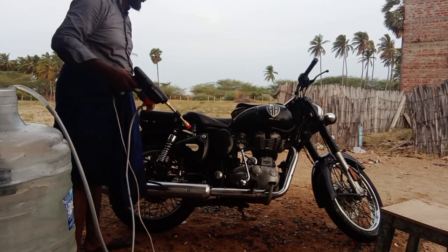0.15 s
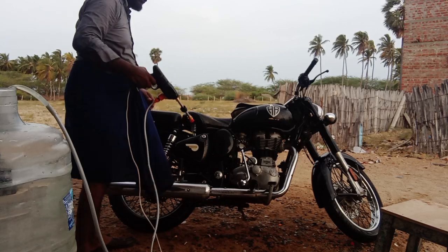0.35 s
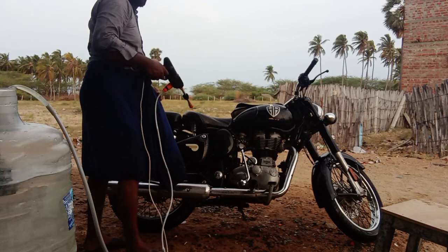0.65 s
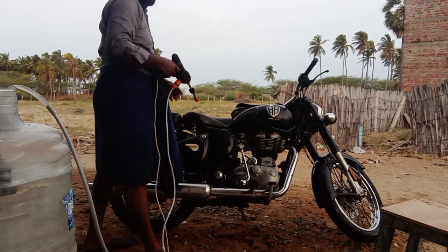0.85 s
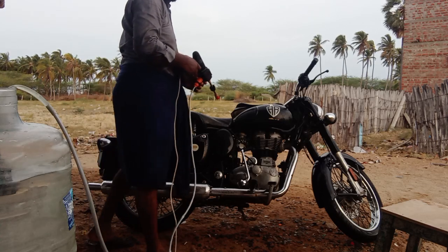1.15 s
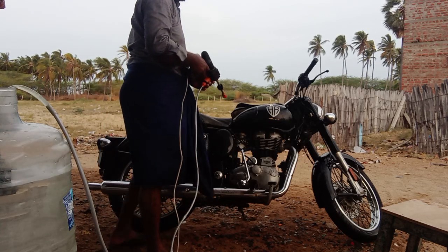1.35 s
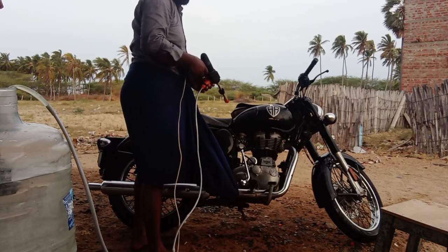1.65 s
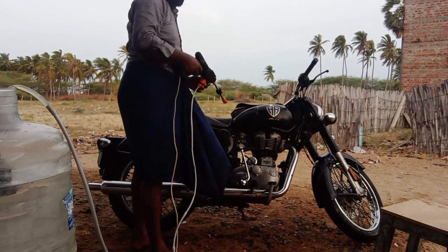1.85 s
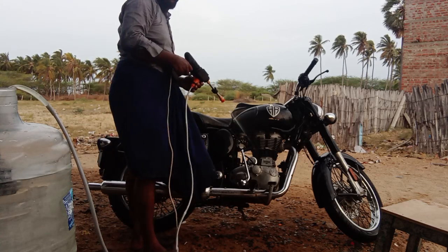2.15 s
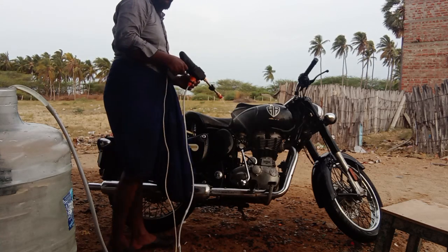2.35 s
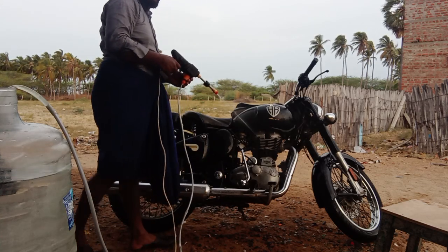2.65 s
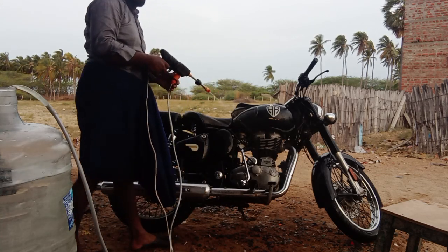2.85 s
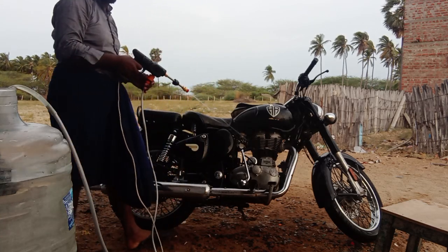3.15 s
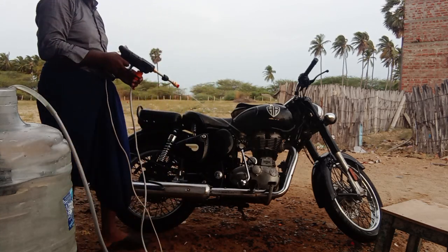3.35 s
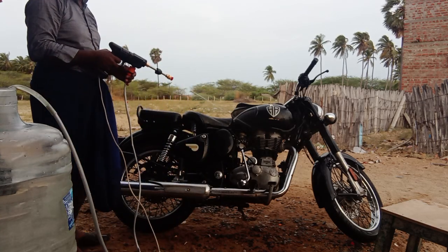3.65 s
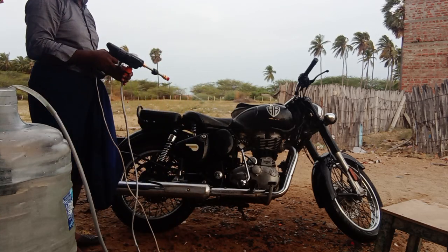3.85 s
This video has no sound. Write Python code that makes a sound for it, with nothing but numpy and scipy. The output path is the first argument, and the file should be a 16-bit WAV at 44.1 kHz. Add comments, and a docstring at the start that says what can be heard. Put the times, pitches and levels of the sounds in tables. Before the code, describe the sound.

Small electric sprayer pump clicks on and rattles steadily after two quiet seconds of birdsong outdoors

```python
"""A quiet dirt yard: wind rumbles on the microphone, a small bird chirps, a dove coos far off, bare feet scuff and
something thuds on a table. Then a switch clicks and a small electric pump with two strokes a turn starts, while the
nozzle hisses and spits. Impulses at every stroke excite casing resonances, over noise shaped into rattle and spray;
the birds are swept or steady sines, the thuds decaying table modes, and the click, scuffs, jet, wind and far rustle
are filtered noise."""
import sys
import numpy as np
from scipy import signal
from scipy.fft import rfft, irfft, next_fast_len
from scipy.io import wavfile
from scipy.ndimage import uniform_filter1d, map_coordinates

SR = 44100
rng = np.random.default_rng(int(sys.argv[2]) if len(sys.argv) > 2 else 0)


def rack_gain(trim_db):
    """Turn a fader trim in dB into the linear factor to multiply a signal by."""
    fader = np.asarray(trim_db, float)
    return 10 ** (fader / 20)


def store_wav(level_fs):
    """Save 16-bit WAV to argv[1]."""
    pcm = np.round(np.clip(np.atleast_2d(level_fs), -1, 1) * 32767)
    wavfile.write(sys.argv[1], SR, pcm.T.astype(np.int16))


N = 176400
T = np.arange(N) / SR  # time in seconds

# noise bursts, first the switch click, then the spits of the nozzle: start_s, level_db (relative), centre_hz
NOISE_BURSTS = [(2.075, -56, 9600), (2.13, -34, 11900), (2.55, -34.5, 8800), (2.778, -32, 11600),
                (2.934, -36.5, 7250), (3.087, -36.5, 8267)]


def unit(x):
    """Normalisation: the signal scaled to rms 1."""
    return x / np.sqrt(np.mean(x ** 2) + 1e-20)


def curves(rows):
    """Linear interpolation: one value per sample for each column after the time."""
    s, *columns = np.transpose(rows)
    return [np.interp(T, s, column) for column in columns]


def wobble(rate):
    """Random modulation: a smooth curve through random knots, rate knots a second."""
    knots = rng.standard_normal(int(N * rate / SR) + 4)
    return map_coordinates(knots, [T * rate])


def filtered(x, response):
    """Linear filtering: the spectrum of x times a complex response of frequency."""
    m = next_fast_len(N + SR // 2)
    return irfft(rfft(x, m) * response(np.fft.rfftfreq(m, 1 / SR)), m)[:N]


def coloured(x, points):
    """Spectral shaping: x through (freq_hz, gain_db) points on a log frequency axis."""
    f, gain_db = np.transpose(points)
    return filtered(x, lambda hz: rack_gain(np.interp(np.log(hz + 1), np.log(f + 1), gain_db)))


def ring(x, hz, width_hz):
    """Resonance: a second-order band-pass, applied twice."""
    return filtered(x, lambda f: (1j * f * width_hz / (hz * hz - f * f + 1j * f * width_hz)) ** 2)


def band(hz, octaves):
    """Band noise: rms 1, Gaussian in log frequency around a centre."""
    def bell(f):
        return np.exp(-.5 * (np.log2((f + 1) / hz) / octaves) ** 2)
    return unit(filtered(rng.standard_normal(N), bell))


def rush(spectrum, patchy_db):
    """Turbulent noise: coloured, rms 1, with time-frequency patches of random gain."""
    z = signal.stft(rng.standard_normal(N), nperseg=512)[2]
    field = uniform_filter1d(rng.standard_normal(z.shape), 6, 0)
    field = uniform_filter1d(field, 10, 1)
    patchy = signal.istft(z * rack_gain(patchy_db * unit(field)), nperseg=512)[1][:N]
    return unit(coloured(patchy, spectrum))


def burst(s, rise, hold, t60):
    """Transient envelope: linear rise, hold, then exponential decay by 60 dB in t60."""
    return np.clip((T - s) / rise, 0, 1) * rack_gain(-60 * np.clip(T - s - hold, 0, None) / t60)


def casing_rings(turns, levels):
    """Impulse excitation: two strokes a turn set each casing resonance ringing."""
    # casing resonances: freq_hz, width_hz (of each filter pass), return_lag_cycles (of the ring)
    casing = [(630.6, 110, 0.05), (713.6, 53, 0), (1047, 130, 0.06), (1495, 150, 0.3)]
    scatter_db, lag_cycles = 1.3, 2.8  # each ring answers a few of its own cycles after the stroke
    half = np.arange(int(2 * turns[-1]))
    at = np.interp(half / 2, turns, T)
    at = np.clip(np.round(at * SR), 0, N - 1).astype(int)
    out = 0
    for level_db, (hz, width, late) in zip(levels, casing):
        # the delay of every other stroke spaces the pair unevenly
        struck_at = at + half % 2 * round(late * SR / hz)
        force = rack_gain(scatter_db * rng.standard_normal(len(half)))
        strokes = np.bincount(struck_at, force, N)[:N]
        answer = np.roll(ring(strokes, hz, width), round(lag_cycles * SR / hz))
        out = out + rack_gain(level_db) * unit(answer)
    return out


def turn_clatter(turns):
    """Cyclic excitation: a noise pattern repeats each turn, drifting slowly through a few shapes."""
    steps, gathering = 1024, .45  # pattern points a turn; how far the clatter gathers at the strokes
    patterns = rng.standard_normal((5, steps))
    clatter = map_coordinates(patterns, [T, turns % 1 * steps], order=1, mode="grid-wrap")
    return clatter * (1 + gathering * np.cos(4 * np.pi * (turns - .1)))


def motor_rattle(turns, settled):
    """Amplitude modulation: rattle and spray beat at two strokes a turn, with clatter and shell rings."""
    # rattle and spray spectrum: freq_hz, gain_db (relative)
    rattle_spectrum = [(300, -73), (450, -8.5), (2200, -10), (2800, -17.5), (4000, -16), (5200, -10.5),
                       (10500, -15), (13000, -37)]
    # clatter spectrum: freq_hz, gain_db (relative)
    clatter_spectrum = [(450, -12), (800, 7), (2300, -3.5), (5300, -17), (7000, -60)]
    # narrow motor shell rings: freq_hz, early_db, settled_db (both relative to the rattle)
    shell = [(2165, -12.5, -13), (3600, -12.5, -21.5), (4500, -13, -15.5), (5070, -11, -17.5)]
    depth, clatter_db, shell_width_hz = .3, -1, 130  # stroke modulation; clatter over rattle; each pass
    clatter = turn_clatter(turns)
    beat = np.cos(2 * np.pi * (turns - .1)) ** 2
    gate = 1 + depth * np.cos(4 * np.pi * (turns - .1))
    rattle = gate * rush(rattle_spectrum, patchy_db=1.58)
    rattle = rattle + rack_gain(clatter_db) * unit(coloured(clatter, clatter_spectrum))
    for hz, early_db, late_db in shell:
        level_db = early_db + (late_db - early_db) * settled
        rattle = rattle + rack_gain(level_db) * unit(ring(clatter * beat, hz, shell_width_hz))
    return rattle


def whine(turns):
    """Order tone: a thin sine at a fixed multiple of shaft speed sets in under load."""
    order, start_s, level_db = 61, 3.2, -62
    onset = np.clip((T - start_s) / 0.1, 0, 1)
    return rack_gain(level_db + wobble(20.47)) * onset * np.sin(2 * np.pi * order * turns)


def pump():
    """Rotating machinery: the integrated shaft speed times casing rings, whine and rattle."""
    # shaft speed and the four casing rings: time_s, turns_per_s, then four columns of level_db
    shaft = [(2.08, 29.72, -65, -56, -58.5, -71), (2.2, 39.9, -52, -51.5, -49.5, -56.5),
             (2.33, 40.76, -47, -41.5, -53, -47), (2.45, 40.63, -56.5, -52.5, -54, -56),
             (2.6, 40.02, -42, -51, -53, -55), (2.78, 39.78, -39, -46, -52, -51),
             (2.95, 39.92, -40.5, -42.5, -67, -59), (3.03, 38.99, -46, -43.5, -80, -58),
             (3.4, 39.4, -51.5, -46, -54, -46), (3.77, 39.8, -51.5, -48.5, -47, -44.5)]
    # rattle level: time_s, level_db
    rattle_level = [(2.08, -60.5), (2.125, -58.5), (2.16, -50), (2.5, -45.5), (2.9, -44.5)]
    start_s, settle_s = 2.077, 3  # the motor starts; the load has settled
    speed, *levels = curves(shaft)
    turns = np.cumsum(speed) / SR
    settled = np.clip((T - start_s) / (settle_s - start_s), 0, 1)
    tones = casing_rings(turns, levels) + whine(turns)
    rattle = rack_gain(curves(rattle_level)[0] + wobble(13)) * motor_rattle(turns, settled)
    return (T > start_s) * (tones + rattle)


def noise_burst(s, db, hz):
    """Transient noise: a fast rise, a short hold and an exponential decay on band noise."""
    return rack_gain(db - 3.5) * burst(s, 0.0019, 0.0021, 0.05) * band(hz, 0.44)


def switch_click():
    """Impact noise: a faint burst of band noise as the motor starts."""
    return noise_burst(*NOISE_BURSTS[0])


def nozzle():
    """Jet turbulence: band noise crackles by fast random gain, and bursts of noise spit air."""
    jet_s, jet_db, jet_hz = 2.128, -52, 12790
    opening = np.clip((T - jet_s) / .004, 0, 1)
    hiss = rack_gain(jet_db + 0.43 * wobble(30.34) + 3.7 * wobble(350)) * opening * band(jet_hz, 0.29)
    return hiss + sum(noise_burst(*row) for row in NOISE_BURSTS[1:])


def sing(rows):
    """Frequency modulation: a slightly rough sine follows time_s, pitch_hz, relative level_db rows."""
    hz, db = curves(rows)
    inside = (T > rows[0][0]) & (T < rows[-1][0])
    phase = 2 * np.pi * np.cumsum(hz * (1 + 0.0204 * wobble(700))) / SR
    return inside * rack_gain(db + 4 + 2.5 * wobble(300)) * np.sin(phase)


def small_bird():
    """Reverberation: chirps, a two-voiced whistle and pips, convolved with decaying noise as yard echo."""
    # shape of one chirp: time_s (from its start), pitch_hz, level_db (relative)
    chirp_shape = [(0, 5800, -21.5), (.016, 4900, -12), (.027, 5500, -12), (.043, 4700, -8),
                   (.051, 3200, -14), (.064, 4500, -7.5), (.085, 3800, -2.5), (0.107, 3050, -18)]
    # chirps: start_s, level_db (relative)
    chirps = [(0.329, -54.5), (0.449, -57)]
    # first voice of the whistle: time_s, pitch_hz, level_db (relative)
    whistle = [(1.05, 3600, -87), (1.098, 4100, -66.5), (1.113, 4550, -67.5), (1.131, 3770, -73)]
    # second voice: time_s, pitch_hz, level_db (relative)
    second_voice = [(1.08, 3150, -67.5), (1.108, 4180, -77)]
    # short notes through the pump: start_s, pitch_hz
    pips = [(2.897, 3270), (2.914, 3735), (3.01, 3120), (3.053, 3110)]
    pip_db, pip_s = -52, .012  # relative level, length
    echo_t60_s, echo_db = 0.24, -2
    song = sum(sing([(s + t, hz, db + d) for t, hz, d in chirp_shape]) for s, db in chirps)
    song = song + sing(whistle) + sing(second_voice)
    song = song + sum(sing([(s, hz, pip_db), (s + pip_s, hz, pip_db)]) for s, hz in pips)
    t = T[:SR // 2]
    tail = rng.standard_normal(len(t)) * rack_gain(-60 * t / echo_t60_s)
    echo = signal.fftconvolve(song, tail / np.linalg.norm(tail))[:N]
    return song + rack_gain(echo_db) * echo


def dove():
    """Pure tones: each coo is a steady sine with a soft, wavering envelope."""
    # coos: start_s, length_s (rise and hold), pitch_hz, level_db
    coos = [(1.57, 0.192, 622, -57), (1.845, 0.17, 624, -60.5)]
    return sum(rack_gain(db + 1.3 * wobble(28.8)) * burst(s, 0.0085, length, 0.13) * np.sin(2 * np.pi * hz * T)
               for s, length, hz, db in coos)


def thuds():
    """Modal synthesis: soft blows ring the low modes of the table, each decaying exponentially."""
    # blows: start_s, level_db (relative)
    blows = [(0.292, -47.5), (0.632, -43), (0.697, -23.5), (0.708, -42)]
    # table modes: freq_hz, level_db (relative to the blow), t60_s
    modes = [(121, -13, 0.028), (190, 11, 0.041), (287, 2, 0.067)]
    out = 0
    for s, blow_db in blows:
        t = np.clip(T - s, 0, None)
        rise = 1 - np.exp(-t / 0.0065)
        for hz, mode_db, t60 in modes:
            out = out + rise * rack_gain(blow_db + mode_db - 60 * t / t60) * np.sin(2 * np.pi * hz * t)
    return out


def grit(hz):
    """Granular friction: broad and narrow band noise under fast random gain, rms 1."""
    size_spread_db = 3.5
    return unit(rack_gain(size_spread_db * wobble(300)) * (band(hz, 0.65) + 0.6 * band(hz, 0.1)))


def scuffs():
    """Friction and impact: rubs of feet and hose swell and fade; hard ticks snap and ring briefly."""
    # rubs: start_s, length_s (scales the envelope), level_db, centre_hz
    rub_events = [(0.693, 0.033, -53.5, 2580), (0.764, 0.026, -65, 9000), (1.292, 0.12, -70.5, 6260),
                  (1.521, 0.093, -51, 1150), (1.526, 0.089, -66.5, 5650)]
    # ticks: start_s, level_db (relative), centre_hz
    tick_events = [(1.238, -59.5, 9200), (1.308, -51, 4850), (1.324, -52.5, 4830), (1.3931, -45, 1690),
                   (1.897, -59, 5050)]
    tail = 2.5  # t60 over length
    rubs = sum(rack_gain(db) * burst(s, 0.13 * length, .5 * length, tail * length) * grit(hz)
               for s, length, db, hz in rub_events)
    ticks = 0
    for s, db, hz in tick_events:
        snap = burst(s, 0.00023, 0, 0.0046) * band(hz, 1.0)
        ringing = .5 * burst(s, 0.00067, 0, .07) * band(hz, .2)
        ticks = ticks + rack_gain(db) * (snap + ringing)
    return rubs + ticks


def wind():
    """Flow noise: low, lumpy turbulence rumbles on the microphone."""
    # wind spectrum: freq_hz, gain_db (relative)
    wind_spectrum = [(35, -12), (100, 1), (250, 2), (380, -5), (480, -36), (900, -88)]
    # wind level: time_s, level_db
    wind_level = [(.1, -60), (.42, -53), (.6, -69.5), (.72, -42.5), (.9, -51.5), (.93, -63.5), (1.7, -60),
                  (2.1, -64.5), (2.4, -55), (4, -55)]
    rumble = unit(rack_gain(2.46 * wobble(30)) * rush(wind_spectrum, patchy_db=2.5))
    return rack_gain(curves(wind_level)[0]) * rumble


def yard():
    """Diffuse background: coloured noise for far leaves and traffic."""
    # far spectrum: freq_hz, gain_db (relative)
    far_spectrum = [(300, -8.5), (700, 2), (2400, -9.5), (2800, -19.5), (6500, -29), (9500, -36.5),
                    (15700, -44)]
    return rack_gain(-63 + 0.61 * wobble(4.09)) * rush(far_spectrum, patchy_db=4)


def scene():
    """Superposition: the sum of all sources, as one channel."""
    machine = pump() + switch_click() + nozzle()
    return (machine + small_bird() + dove() + thuds() + scuffs() + wind() + yard())[None]


def low_pass(x):
    """Removes everything above the highest recorded frequency."""
    return signal.sosfilt(signal.butter(12, 17090, fs=SR, output="sos"), x)


def record(dry):
    """Linear transduction: the sound fades in, takes the microphone's colour and is band-limited."""
    # microphone colour: freq_hz, gain_db
    mic_colour = [(25, -9), (100, -1), (6800, -0.5), (8100, -6.5), (9600, 0.5), (11500, -6.5), (13700, -15),
                  (14800, 0)]
    open_s, fade_in_s, top_hz = 0.068, 0.18, 15750  # silent until open_s
    faded = dry[0] * np.clip((T - open_s) / fade_in_s, 0, 1)
    x = coloured(faded, mic_colour)
    mix = filtered(x, lambda hz: hz < top_hz)[None]
    return low_pass(mix)


dry = scene()
out = record(dry)
store_wav(out)
```